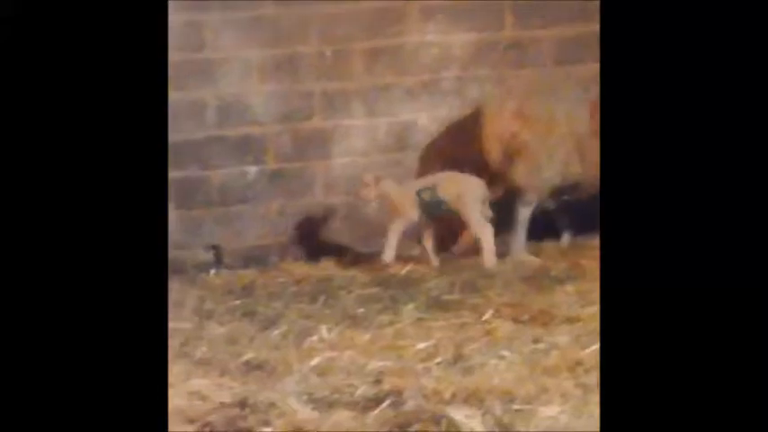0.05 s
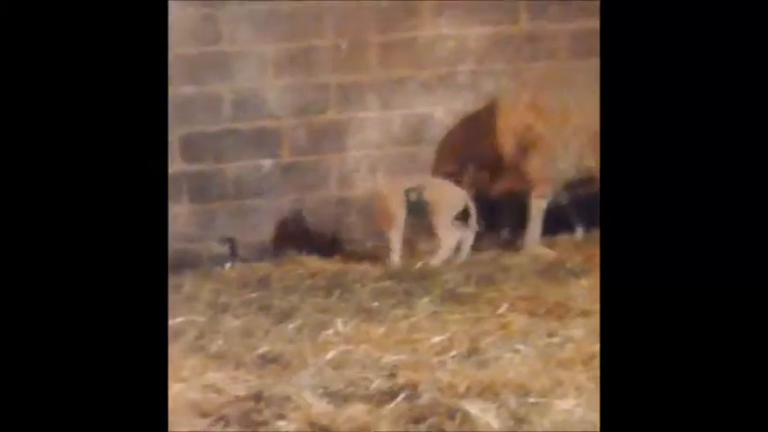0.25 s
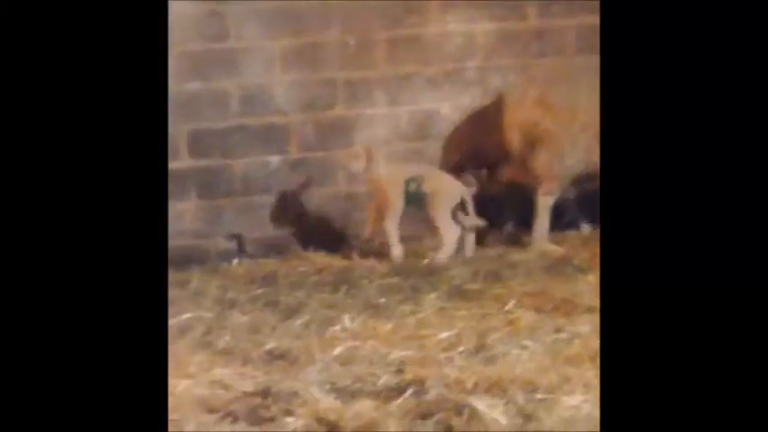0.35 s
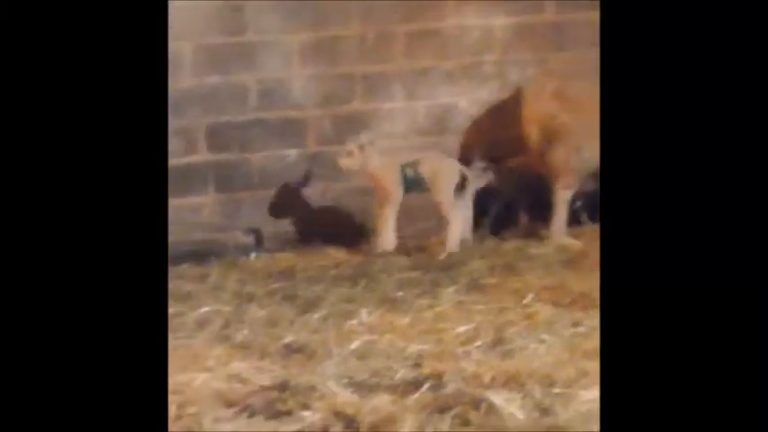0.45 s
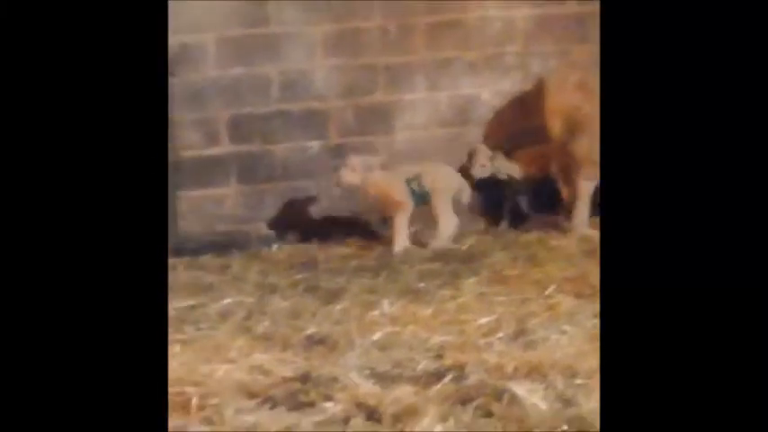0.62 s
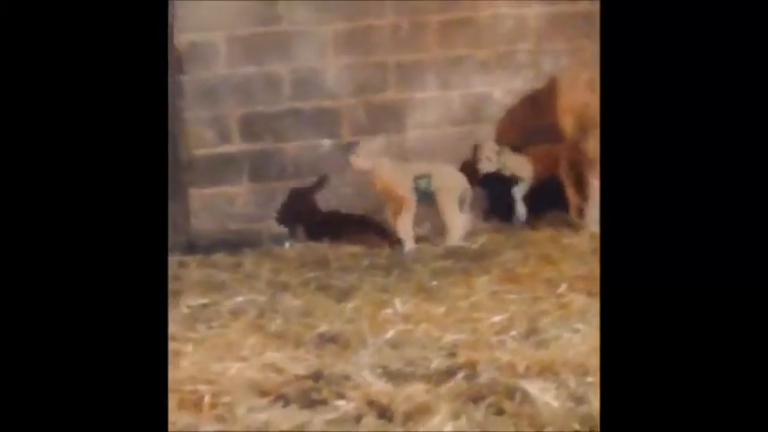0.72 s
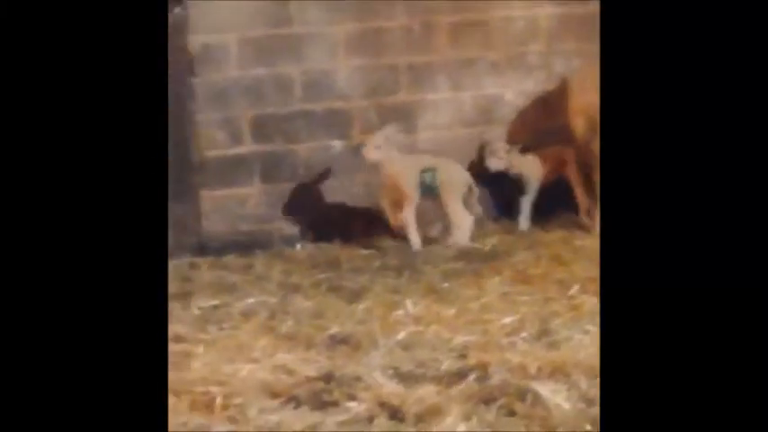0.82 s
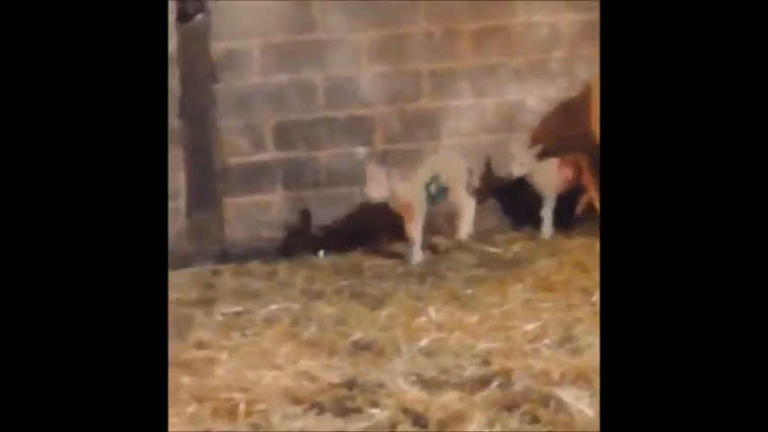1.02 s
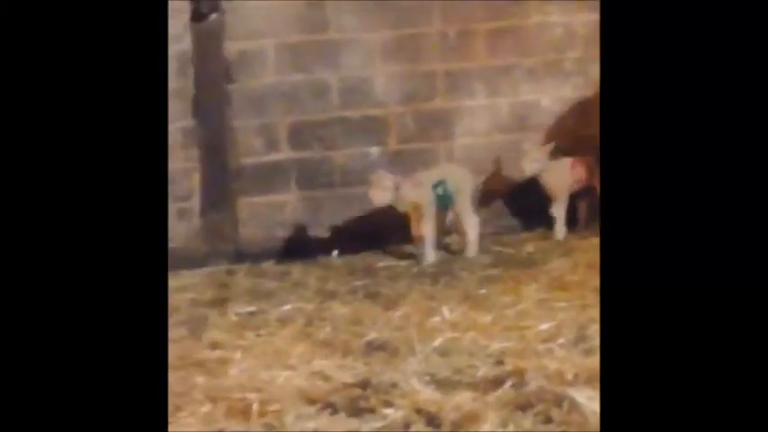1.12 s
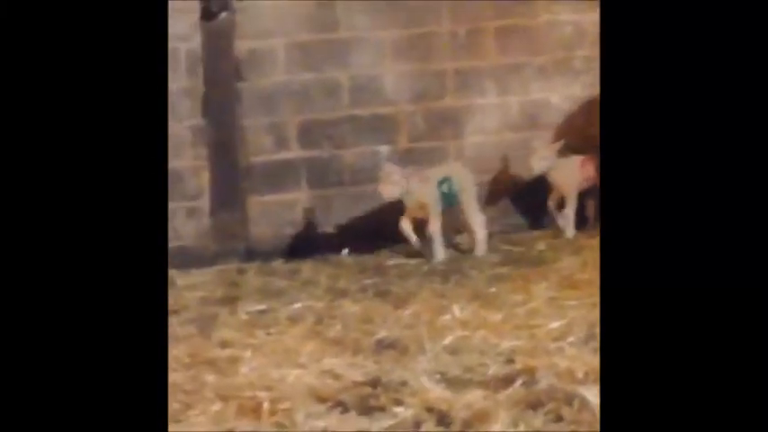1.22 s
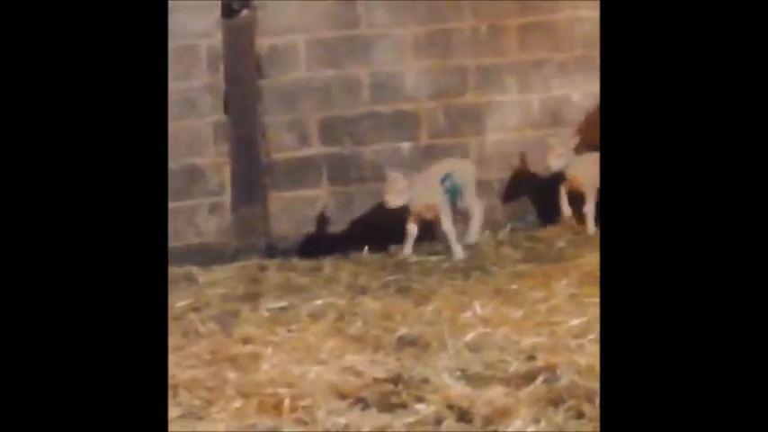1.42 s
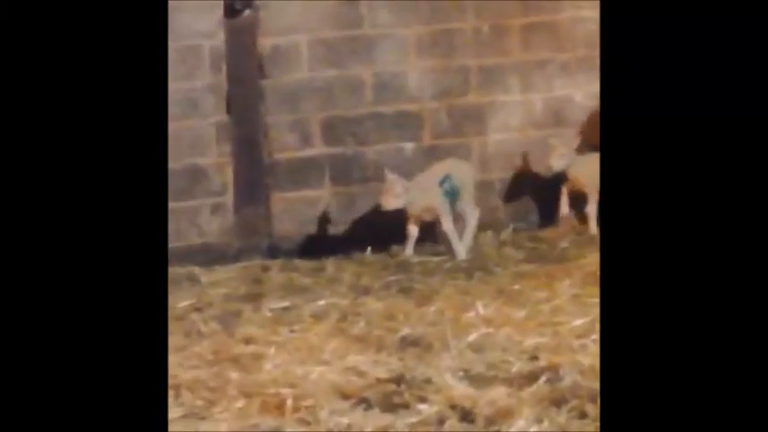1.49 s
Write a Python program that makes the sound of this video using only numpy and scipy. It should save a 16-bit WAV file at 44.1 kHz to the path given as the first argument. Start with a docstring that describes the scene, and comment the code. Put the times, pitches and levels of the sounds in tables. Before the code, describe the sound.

A sheep gives one hoarse, rattling bleat a few steps from the microphone, ringing briefly in a block-walled shed. Straw rustles softly underfoot, then a thin, faint call comes from farther off over low background noise.

```python
"""A low background runs from the start. At 0.18 s a sheep gives one hoarse bleat in a block-walled shed:
uneven, rattling pulses of the vocal folds ring the mouth, and puffs of air ring the throat.
The jaw closes and the call ends in a low nasal hum; the shed rings on for most of a second.
Straw rustles underfoot, loudest near 1 s. A thin far call follows from 1.15 s."""
import sys
import numpy as np
from scipy import signal
from scipy.fft import rfft, irfft
from scipy.io import wavfile
from scipy.ndimage import uniform_filter1d

SR = 44100
rng = np.random.default_rng(int(sys.argv[2]) if len(sys.argv) > 2 else 0)


def waveform_to_disk(signal):
    """Save audio, clipped to [-1, 1], as 16-bit WAV at the path in sys.argv[1]."""
    frames = np.transpose(np.atleast_2d(signal))
    scaled = np.clip(frames, -1, 1) * 32767
    samples = np.round(scaled).astype(np.int16)
    wavfile.write(sys.argv[1], SR, samples)


N = 68355

# vocal fold pitch (time [s], pitch [Hz])
PITCH_HZ = [(.18, 152), (.23, 156), (.28, 166), (.33, 165), (.41, 169), (.5, 170), (.6, 168), (.69, 168),
            (.75, 165), (.8, 162), (.97, 163), (1.12, 165)]
# hoarseness (time [s], roughness [0-1])
ROUGHNESS = [(.18, .5), (.32, .65), (.44, .55), (.52, .42), (.6, .42), (.64, .1), (.675, .35), (.77, .35),
             (.85, .5), (1.0, .4)]
# force through the open mouth (time [s], level [dB])
EFFORT_DB = [(.15, -28), (.176, -23), (.188, -12), (.2, -6), (.24, -3), (.29, 0), (.32, -2), (.39, 2),
             (.46, .5), (.495, 2.5), (.535, -1), (.64, 1), (.72, 1.5), (.76, 3.5), (.785, -3.5), (.83, .5),
             (.872, -.5), (.884, -33)]
# jaw (time [s], opening [0-1])
JAW_OPENING = [(.18, 0.38), (.27, 1), (.44, 1), (.6, 1), (.77, 0.45), (.86, 0.06)]
# lower mouth resonances
# (base [Hz], open-jaw shift [Hz], slide [Hz/s], width [Hz], level [dB], open-jaw gain [dB])
LOWER_MODES = [(1110, 22, 46, 50, -21, 0), (1262, 98, 20, 65, -5, 7.5), (1520, 30, -5, 220, -15, 8)]
# upper mouth resonances
# (base [Hz], open-jaw shift [Hz], slide [Hz/s], width [Hz], level [dB], open-jaw gain [dB])
UPPER_MODES = [(1850, 20, 70, 150, -10, 7.5), (1985, 0, 115, 42, -2.5, 1.5), (2030, 0, 230, 42, -2, -6)]
# upper resonance envelope (time [s], level [dB])
UPPER_DB = [(.19, 6.5), (.25, 1.5), (.295, 5), (.33, 0), (.42, 1), (.53, -2), (.64, 3.5), (.72, 2),
            (.795, 0), (.83, 3.5), (.872, 6)]
# sharp top resonance (time [s], level [dB])
EDGE_DB = [(.3, -45), (.5, -48), (.56, -39), (.61, -45), (.67, -37), (.7, -51), (.74, -49), (.78, -59),
           (.845, -40), (.875, -45.5)]
# partials of the clearing voice (pitch multiple [-], level [dB])
CLEAR_HARMONICS = [(4, -42.5), (5, -47), (6, -50), (8, -35), (9, -42.5), (11, -35), (12, -33.5), (13, -42)]
# breath rasp (frequency [Hz], relative density [dB])
RASP_SPECTRUM = [(60, -58), (800, -20), (2000, 6), (3200, 5.5), (4300, -0.5), (6200, -4.5), (7100, 0.5),
                 (8200, -9.5), (15000, -35)]
# third partial, near 500 Hz, and a faint fifth (pitch multiple [-], level [dB])
PULSING_HARMONICS = [(3, -32.5), (5, -57.5)]
# 500 Hz partial: pulsing during the call, then wavering as the shed rings on (time [s], level [dB])
PULSING_DB = [(.2, -30), (.225, -12), (.28, 2), (.31, -3), (.37, 4), (.415, 7), (.43, 4), (.46, 9),
              (.493, -12), (.51, 3), (.532, -8), (.56, 8), (.59, -1), (.615, 7), (.65, -4), (.67, 1),
              (.69, -7), (.715, 3), (.735, -3), (.762, 8), (.81, -15), (.84, -5), (.863, -16), (.885, -5),
              (.915, -17), (.94, -9), (.96, -21), (.985, -13), (1.01, -28), (1.04, -11), (1.14, -35)]
# second partial, the body of the voice (time [s], level [dB])
BODY_DB = [(.18, -52), (.2, -50.5), (.3, -46), (.36, -46), (.41, -41), (.46, -60), (.5, -43), (.54, -40),
           (.6, -55), (.65, -43), (.73, -44.5), (.8, -54.5), (.9, -72)]
# nasal hum partials (pitch multiple [-], level [dB])
HUM_HARMONICS = [(1, -56), (2, -61.5), (4, -64.5), (7, -61)]
# nasal hum envelope (time [s], level [dB])
HUM_DB = [(.2, -8.5), (.39, -1), (.43, -5), (.51, 5), (.6, -4), (.665, 13.5), (.72, 5), (.85, 5), (.9, -1),
          (1.04, 5), (1.11, 1), (1.18, -10), (1.3, -54)]
# straw envelope (time [s], level [dB])
STRAW_DB = [(0, -69.5), (.42, -59), (.6, -52.5), (.88, -55.5), (.98, -51), (1.1, -53.5), (1.3, -56.5),
            (1.42, -58.5), (1.55, -64)]
# straw rustle (frequency [Hz], relative density [dB])
STRAW_SPECTRUM = [(400, 5), (1500, 2), (2800, -4.5), (4500, -1), (8000, -1.5), (15000, -3)]
# far call partials (pitch multiple [-], level [dB])
FAR_HARMONICS = [(1, -74), (2, -58), (3, -75), (4, -83.5), (5, -70)]
# far call envelope (time [s], level [dB])
FAR_DB = [(1.14, -19), (1.26, 1), (1.31, 2), (1.345, 0), (1.38, 3), (1.42, -14), (1.44, 3), (1.465, 7),
          (1.49, -7), (1.55, -13)]
# faint high whistle (time [s], level [dB])
WHISTLE_DB = [(1.15, -75), (1.2, -78), (1.3, -68.5), (1.36, -79), (1.52, -75)]
# background noise (frequency [Hz], relative density [dB])
FLOOR_SPECTRUM = [(25, -30), (60, -4), (110, 4), (200, 4), (300, -11.5), (500, -7), (1100, -16.5),
                  (3000, -21), (15000, -27.5)]
# low part of the background (time [s], gain [dB])
RUMBLE_DB = [(0, -2), (.12, 6), (.3, 1.5), (.9, -1.5), (1.55, -4.5)]
# brief treble dips (time [s], half length [s], depth [dB])
TREBLE_DIPS = [(.399, .006, 13), (.644, .013, 32), (.697, .005, 10), (.762, .005, 14), (.868, .006, 15),
               (1.507, .008, 13)]

# reflections relative to the direct sound (near walls [dB], tail [dB])
MOUTH_WET_DB, LOW_WET_DB = (-1, -3), (-14, -12)
TIME_S = np.arange(N) / SR
SINCE_ONSET_S = TIME_S - .18


def bleat(wobble=.035, quaver_db=1.3, rasp_db=-52, rasp_jaw_db=4.5):
    """Rattling fold pulses and air drive mouth and throat; partials emerge as the voice clears."""
    rough, jaw = in_time(ROUGHNESS), in_time(JAW_OPENING)
    cycles = np.cumsum(in_time(PITCH_HZ) * (1 + wobble * rough * drift(40))) / SR
    pulses, air = fold_pulses(cycles, rough)
    pulses *= rattle(rough)
    effort = swell(EFFORT_DB) * from_db(quaver_db * drift(28))
    clear = (1 - rough) ** 2 * partials(cycles, CLEAR_HARMONICS, flutter_db=4.5)
    rasp = from_db(rasp_db + rasp_jaw_db * jaw) * colour(air, RASP_SPECTRUM)
    voice = effort * (mouth(pulses, jaw) + clear + rasp + growl(air, rough)) + edge(pulses)
    low = low_voice(cycles)
    return shed(voice, MOUTH_WET_DB) + shed(low, LOW_WET_DB)


def fold_pulses(cycles, rough, jitter_cycles=.13, shimmer_db=3.5, air_share=.45):
    """One pulse a cycle, uneven in time and strength, each with a puff of turbulent air."""
    starts = np.flatnonzero(np.diff(np.floor(cycles)) > 0)
    timing, strength = rng.standard_normal((N // 100, 2))[:len(starts)].T
    delay_samples = (jitter_cycles * rough[starts] * timing * N / cycles[-1]).astype(int)
    pulses = np.zeros(N)
    pulses[np.clip(starts + delay_samples, 0, N - 1)] = from_db(shimmer_db * rough[starts] * strength)
    air = unit_rms(rng.standard_normal(N) * np.exp(-3 * (cycles % 1)))
    return unit_rms(pulses) + air_share * rough * air, air


def rattle(rough, flap_hz=64, unevenness=.4, depth=1.4):
    """Loose throat tissue flaps unevenly and chops the flow, more so when hoarse."""
    flaps = np.cumsum(flap_hz * (1 + unevenness * drift(flap_hz))) / SR
    return 1 + depth * rough * np.cos(2 * np.pi * flaps)


def mouth(pulses, jaw, level_db=-34.5, lower_db=1, low_hz=1068, top_hz=2300):
    """Mouth resonances shift in frequency and level with the jaw."""
    def ring(modes):
        total = np.zeros(N)
        for base_hz, shift_hz, slide_hz_per_s, width_hz, db, open_db in modes:
            centre_hz = base_hz + shift_hz * jaw + slide_hz_per_s * SINCE_ONSET_S
            total += from_db(db + open_db * jaw) * steady(resonate(pulses, centre_hz, width_hz))
        return total

    both = from_db(lower_db) * ring(LOWER_MODES) + from_db(in_time(UPPER_DB)) * ring(UPPER_MODES)
    return from_db(level_db) * cut(cut(both, low_hz, "high", order=5), top_hz, "low", order=10)


def edge(pulses, base_hz=2420, rise_hz_per_s=276, band_hz=(1850, 3700)):
    """A sharp, rising top resonance that opens late in the call."""
    ring = resonate(pulses, base_hz + rise_hz_per_s * SINCE_ONSET_S, width_hz=76)
    return swell(EDGE_DB) * steady(cut(ring, band_hz, "band"))


def growl(air, rough, level_db=-38, fade_db_per_s=4, band_hz=(270, 620)):
    """Air puffs ring the throat, most at the start."""
    ring = unit_rms(cut(resonate(air, centre_hz=414, width_hz=154), band_hz, "band", order=3))
    return from_db(level_db - fade_db_per_s * SINCE_ONSET_S) * rough * ring


def low_voice(cycles):
    """Clean low partials: a pulsing tone near 500 Hz, the body and the hum through the nose."""
    pulsing = swell(PULSING_DB) * partials(cycles, PULSING_HARMONICS, flutter_db=1.3)
    body = swell(BODY_DB) * partials(cycles, [(2, 0)], flutter_db=1.3)
    hum = swell(HUM_DB) * partials(cycles, HUM_HARMONICS, flutter_db=2.5)
    return pulsing + body + hum


def shed(x, wet_db, wall_t60_s=.09, tail_t60_s=.77, treble_t60_s=.25, split_hz=3220, gap_s=.00289):
    """Direct sound, a quick blur from the near walls and a long tail whose treble dies first."""
    t = np.arange(SR) / SR
    early, late = rng.standard_normal((2, SR)) * (t > gap_s)
    walls = early * from_db(-60 * t / wall_t60_s)
    decay = from_db(-60 * t / tail_t60_s)
    tail = cut(late, split_hz, "low", order=4) * decay
    tail += cut(late, split_hz, "high", order=4) * from_db(-60 * t / treble_t60_s)
    wall_gain, tail_gain = from_db(wet_db)
    echoes = wall_gain * walls / np.linalg.norm(walls) + tail_gain * tail / np.linalg.norm(decay)
    return (x + signal.fftconvolve(x, echoes)[:N]) / np.sqrt(1 + wall_gain ** 2 + tail_gain ** 2)


def straw(snaps_per_s=970, snap_db=-6.5, spread_db=5.5):
    """A soft rustle with tiny snaps of stalks."""
    snaps = (rng.random(N) < snaps_per_s / SR) * rng.choice([-1, 1], N)
    snaps = snaps * from_db(spread_db * np.minimum(rng.exponential(1, N), 4))
    rustle = colour(rng.standard_normal(N) + from_db(snap_db) * unit_rms(snaps), STRAW_SPECTRUM)
    return from_db(in_time(STRAW_DB) + drift(7.9)) * rustle


def far_call(pitch_hz=373.6, whistle_hz=3730, waver=.005):
    """A faint wavering note in two swells, strongest on its second partial, under a thin whistle."""
    warped_s = np.cumsum(1 + waver * drift(42)) / SR
    note = swell(FAR_DB) * partials(pitch_hz * warped_s, FAR_HARMONICS, flutter_db=-1.5)
    whistle = swell(WHISTLE_DB) * np.sqrt(2) * np.sin(2 * np.pi * whistle_hz * warped_s)
    return shed(note + whistle, LOW_WET_DB)


def background(base_db=-56.5, split_hz=523):
    """A faint steady hiss over a rumble that swells early, then eases."""
    noise = from_db(base_db) * colour(rng.standard_normal(N), FLOOR_SPECTRUM)
    rumble = cut(noise, split_hz, "low", order=1)
    return noise - rumble + from_db(in_time(RUMBLE_DB)) * rumble


def partials(cycles, harmonics, flutter_db, flutter_hz=22, flutter_cycles=.06):
    """Sines on multiples of a pitch, each fluttering on its own in level and phase."""
    total = np.zeros(N)
    for multiple, db in harmonics:
        amplitude = np.sqrt(2) * from_db(db + flutter_db * drift(flutter_hz))
        phase = multiple * cycles + rng.random() + flutter_cycles * drift(flutter_hz)
        total += amplitude * np.cos(2 * np.pi * phase)
    return total


def resonate(x, centre_hz, width_hz):
    """A resonance whose centre may move, at unit power."""
    carrier = np.exp(2j * np.pi * np.cumsum(centre_hz * np.ones(N)) / SR)
    pole = np.exp(-np.pi * width_hz / SR)
    return unit_rms((signal.lfilter([1], [1, -pole], x / carrier) * carrier).real)


def colour(x, spectrum):
    """Apply a smooth spectrum, at unit power."""
    hz, db = np.transpose(spectrum)
    bins_hz = np.maximum(np.arange(N + 1) * SR / (2 * N), 1)
    gain = from_db(np.interp(np.log(bins_hz), np.log(hz), db))
    return unit_rms(irfft(rfft(x, 2 * N) * gain)[:N])


def cut(x, hz, kind, order=2):
    """Butterworth filter."""
    return signal.sosfilt(signal.butter(order, hz, kind, fs=SR, output="sos"), x)


def drift(rate_hz):
    """Slow random wander at unit power."""
    return unit_rms(cut(rng.standard_normal(N + SR), rate_hz, "low")[SR:])


def in_time(curve):
    """A curve's value at every sample."""
    return np.interp(TIME_S, *np.transpose(curve))


def swell(curve, fade_db_per_s=1000):
    """Gain of a level curve, fading to silence outside it."""
    outside_s = np.maximum(0, np.maximum(curve[0][0] - TIME_S, TIME_S - curve[-1][0]))
    return from_db(in_time(curve) - fade_db_per_s * outside_s)


def steady(x, window_s=.03):
    """Hold the running power at one."""
    return x / np.sqrt(np.maximum(uniform_filter1d(x ** 2, int(window_s * SR)), 1e-9))


def unit_rms(x):
    """Scale to unit power."""
    return x / np.sqrt(np.mean(x ** 2) + 1e-20)


def from_db(db):
    """Decibels to gain."""
    return 10 ** (np.asarray(db) / 20)


def scene():
    """All sources in mono, a few steps from the sheep."""
    return (bleat() + straw() + far_call() + background())[None]


def record(dry):
    """The treble dips briefly six times; the top is cut."""
    split_hz, cutoff_hz = 2400, 15400
    low = signal.sosfiltfilt(signal.butter(8, split_hz, fs=SR, output="sos"), dry)
    dip_db = sum(db * np.exp(-((TIME_S - at_s) / half_s) ** 4) for at_s, half_s, db in TREBLE_DIPS)
    dipped = low + (dry - low) * from_db(-dip_db)
    return signal.sosfilt(signal.ellip(12, .1, 80, cutoff_hz, fs=SR, output="sos"), dipped)


dry = scene()
out = record(dry)
waveform_to_disk(out)
```